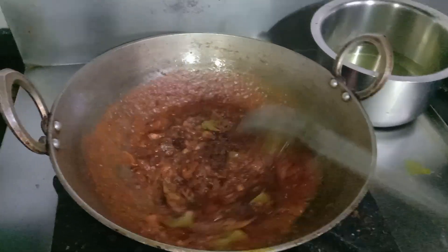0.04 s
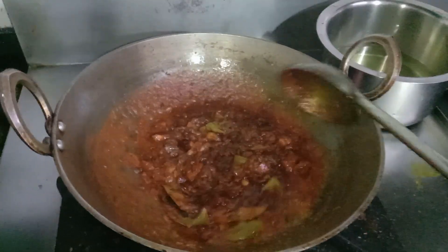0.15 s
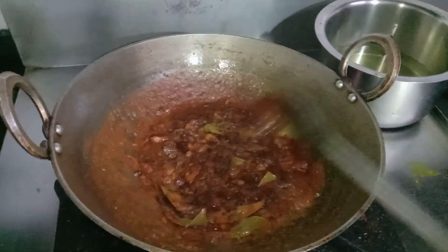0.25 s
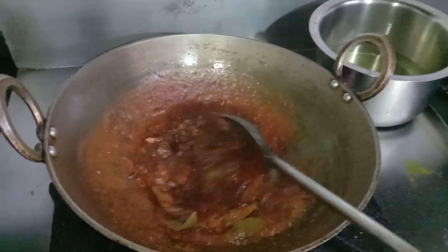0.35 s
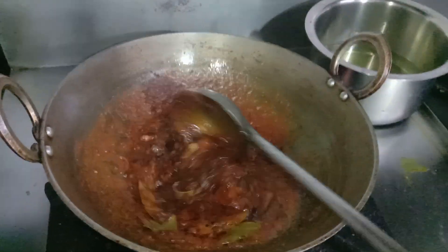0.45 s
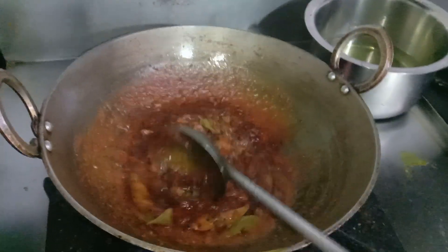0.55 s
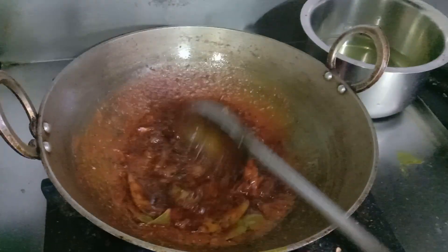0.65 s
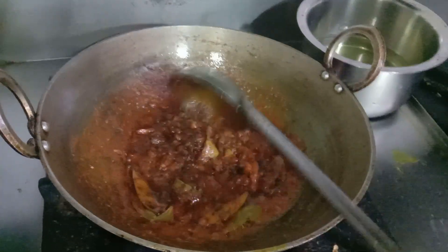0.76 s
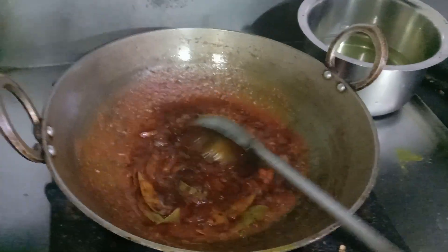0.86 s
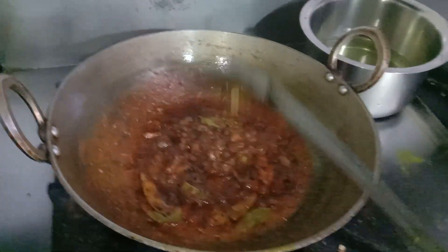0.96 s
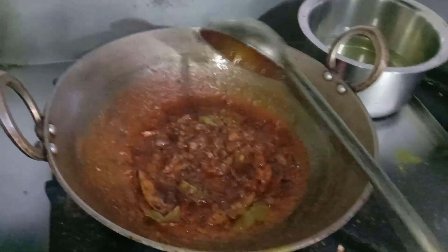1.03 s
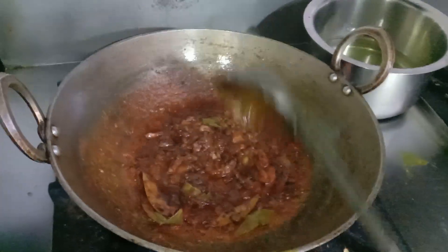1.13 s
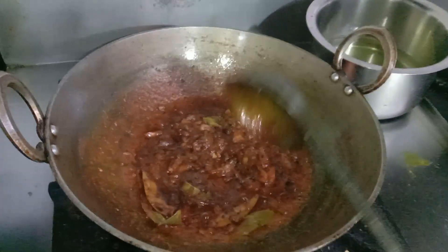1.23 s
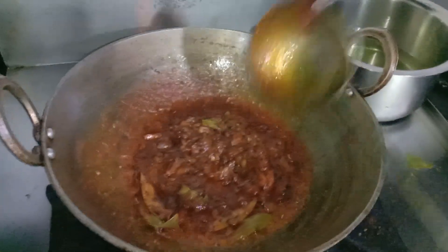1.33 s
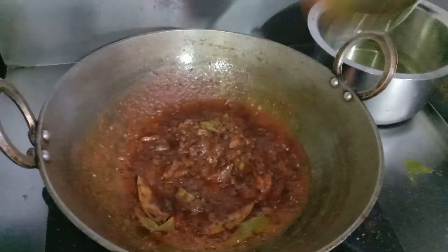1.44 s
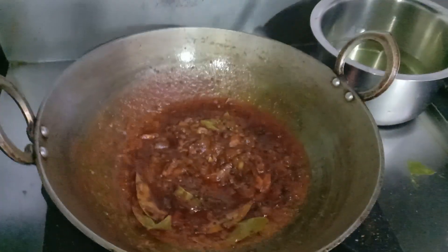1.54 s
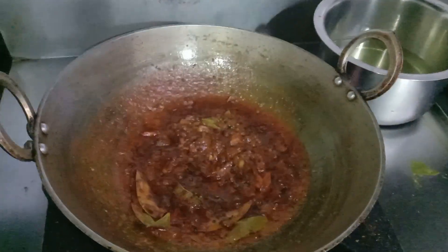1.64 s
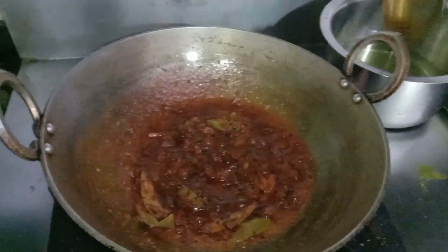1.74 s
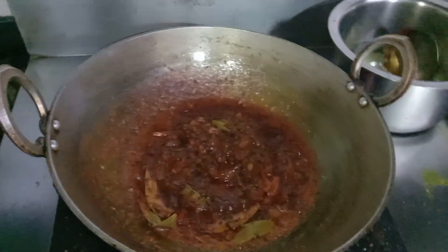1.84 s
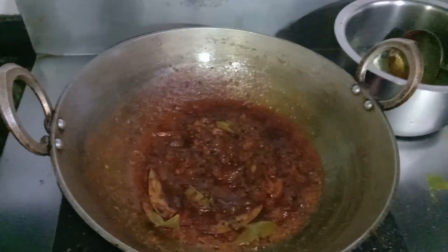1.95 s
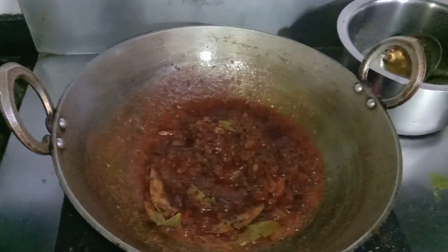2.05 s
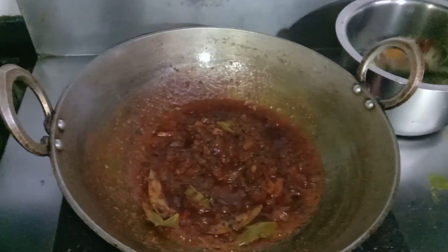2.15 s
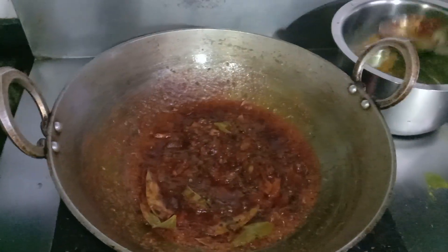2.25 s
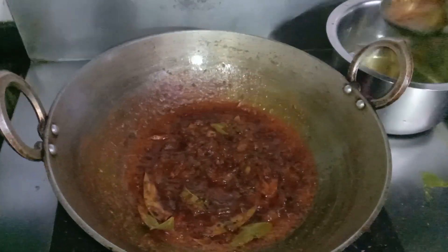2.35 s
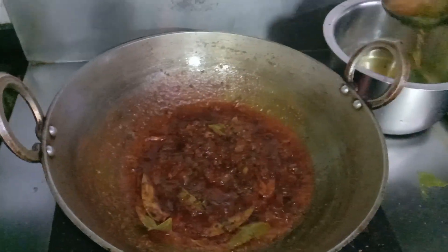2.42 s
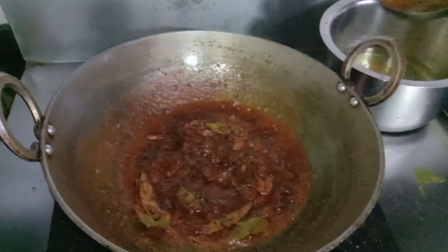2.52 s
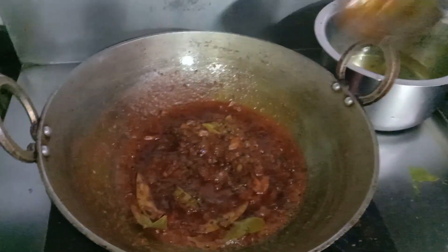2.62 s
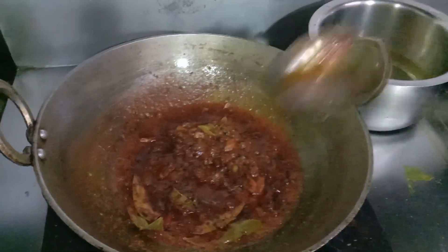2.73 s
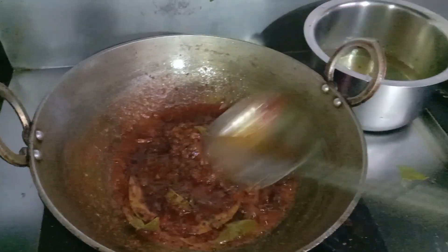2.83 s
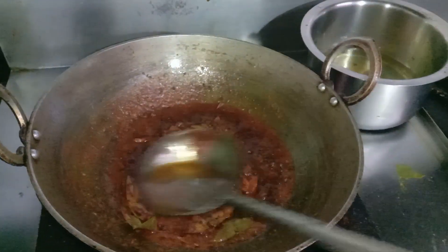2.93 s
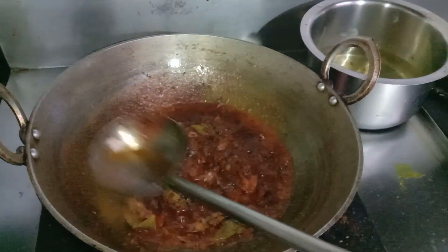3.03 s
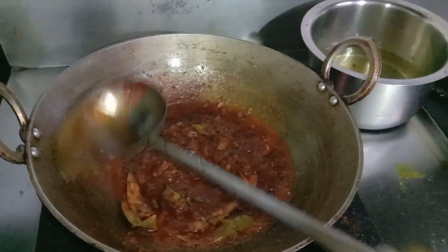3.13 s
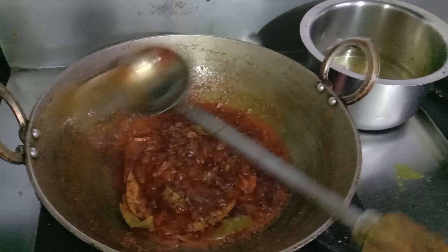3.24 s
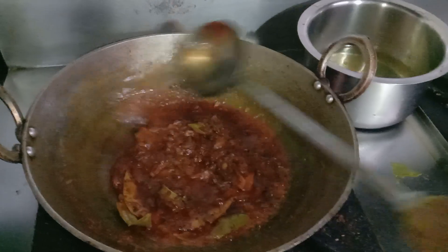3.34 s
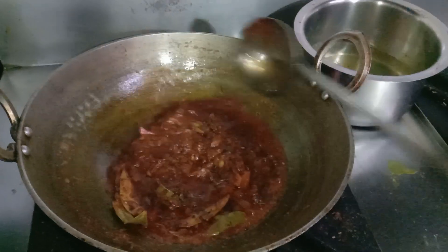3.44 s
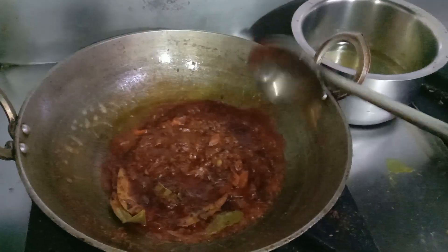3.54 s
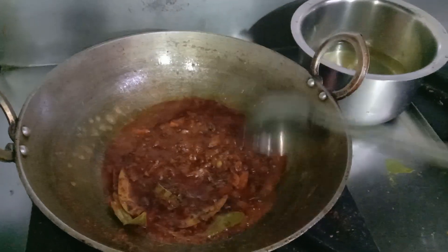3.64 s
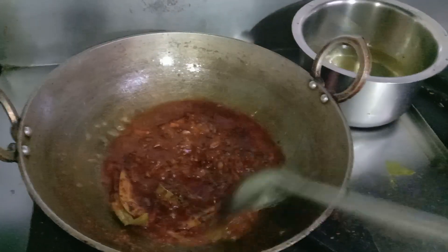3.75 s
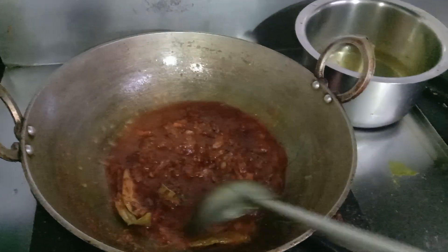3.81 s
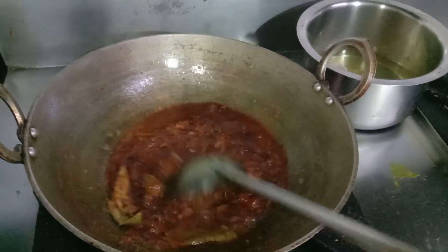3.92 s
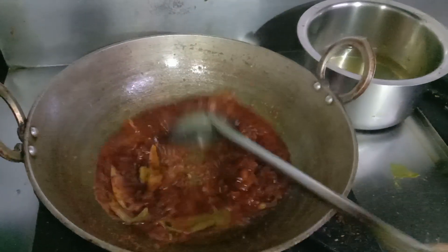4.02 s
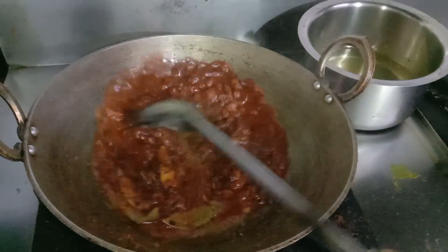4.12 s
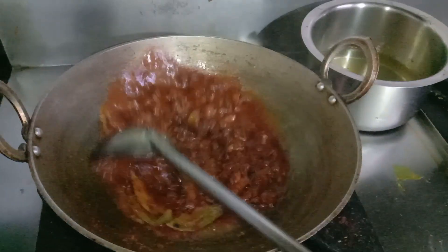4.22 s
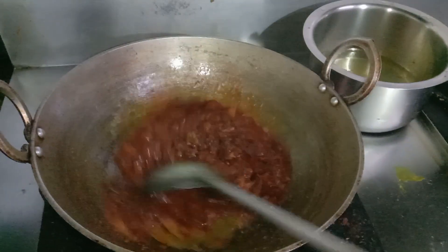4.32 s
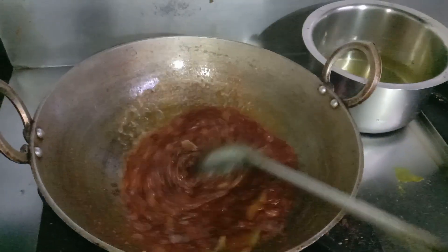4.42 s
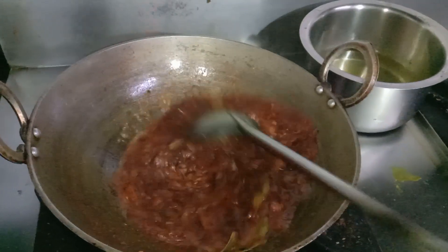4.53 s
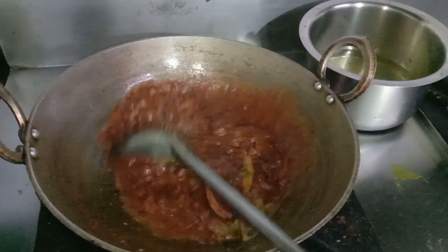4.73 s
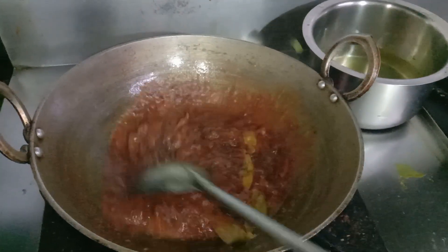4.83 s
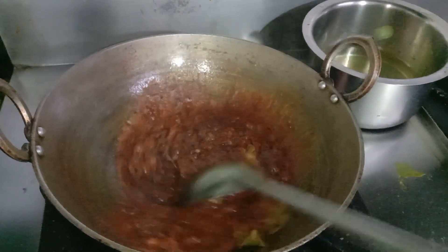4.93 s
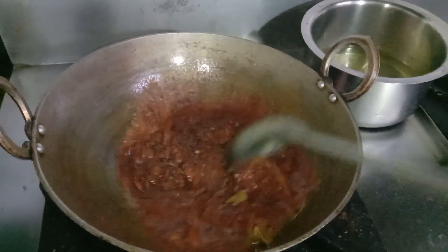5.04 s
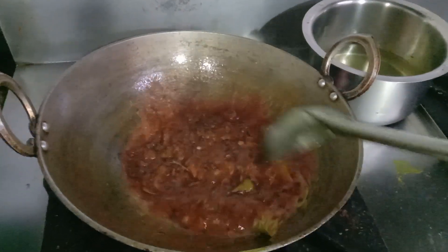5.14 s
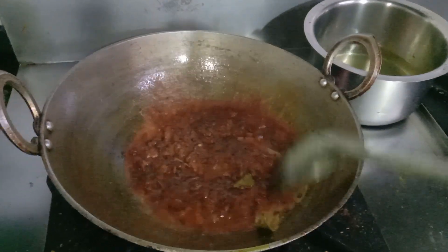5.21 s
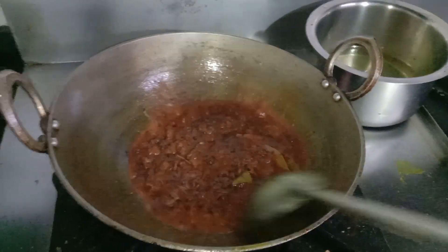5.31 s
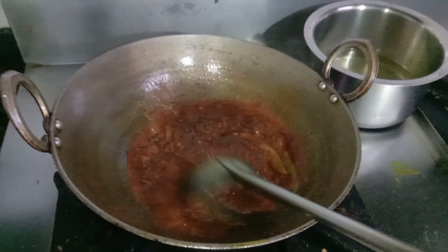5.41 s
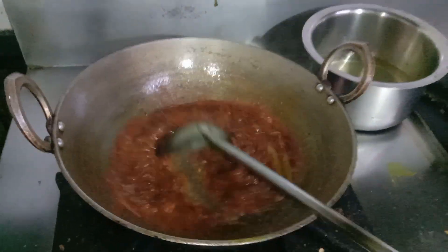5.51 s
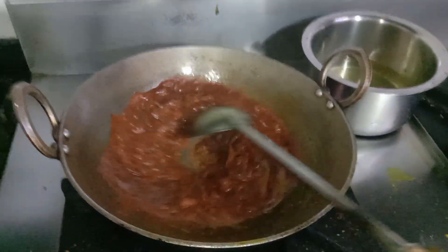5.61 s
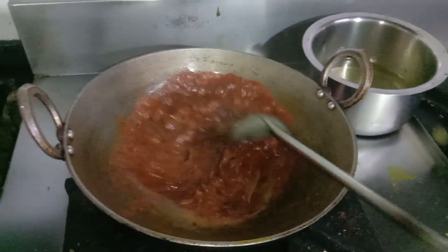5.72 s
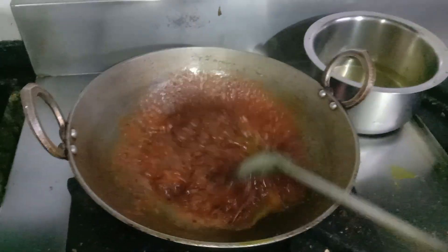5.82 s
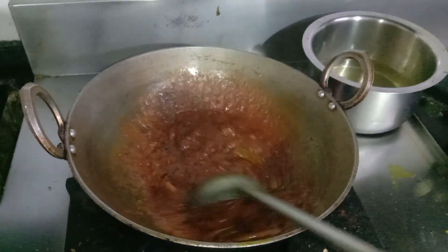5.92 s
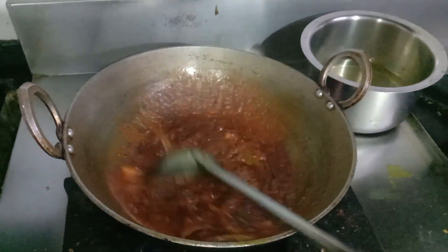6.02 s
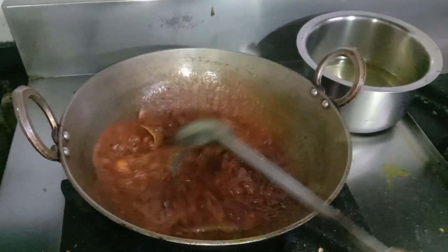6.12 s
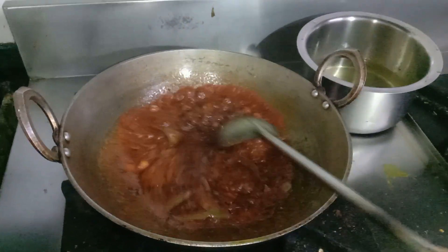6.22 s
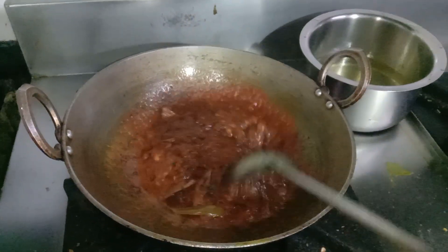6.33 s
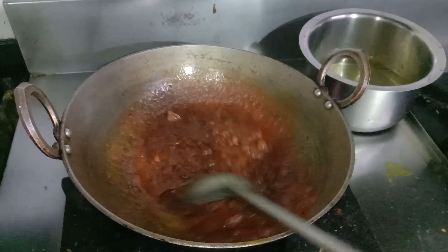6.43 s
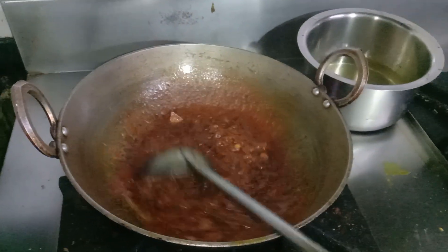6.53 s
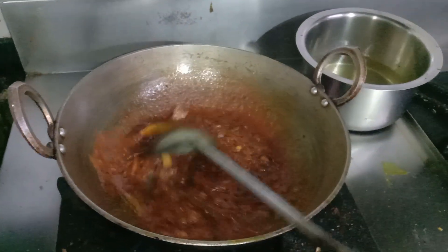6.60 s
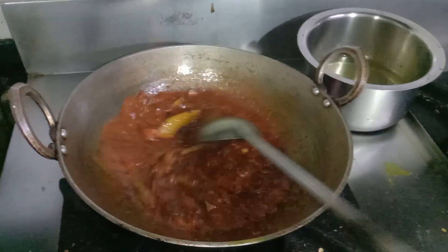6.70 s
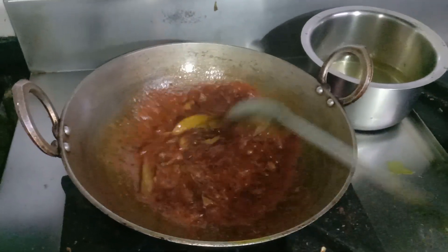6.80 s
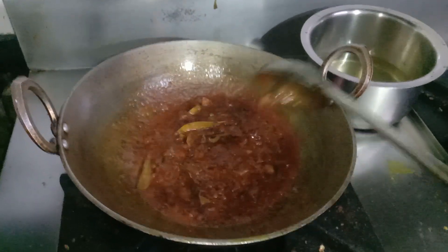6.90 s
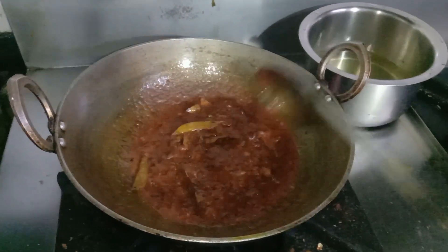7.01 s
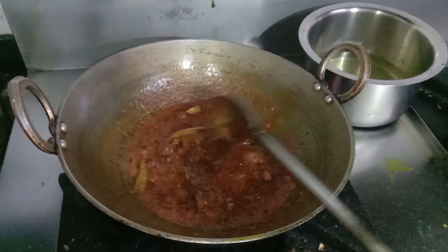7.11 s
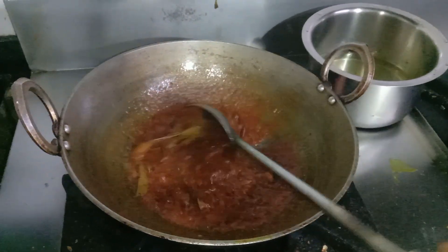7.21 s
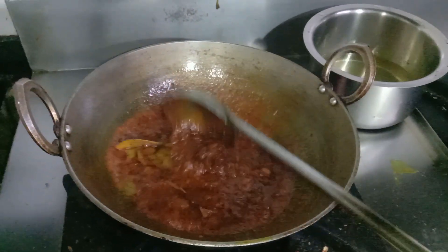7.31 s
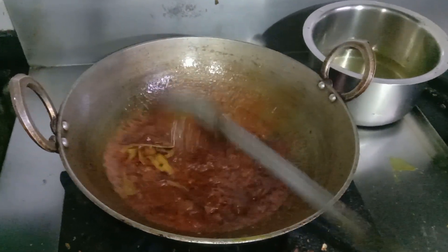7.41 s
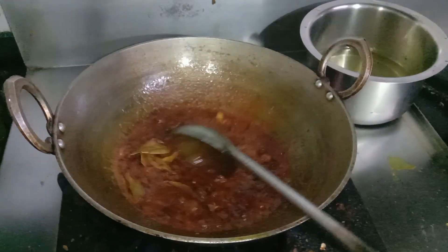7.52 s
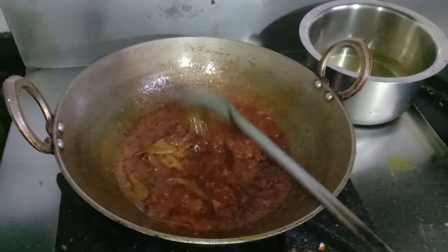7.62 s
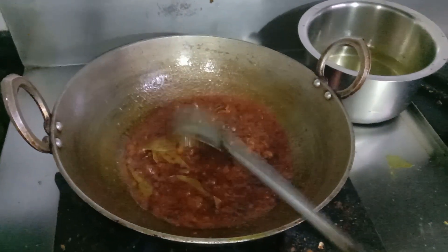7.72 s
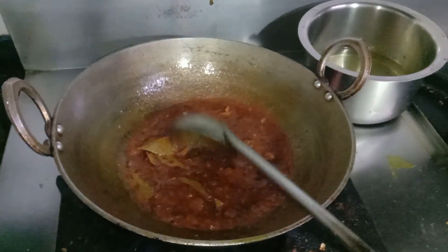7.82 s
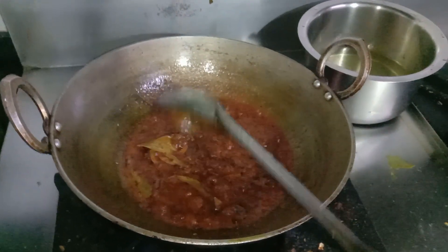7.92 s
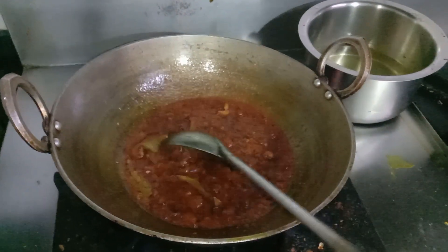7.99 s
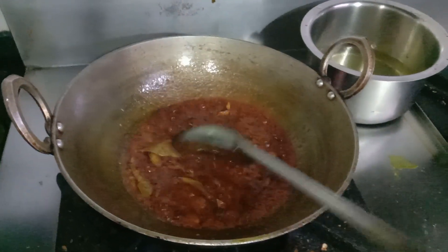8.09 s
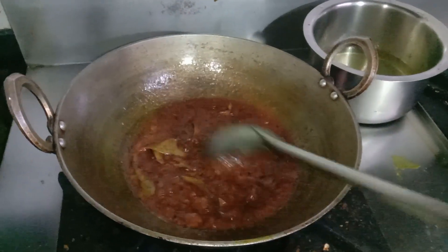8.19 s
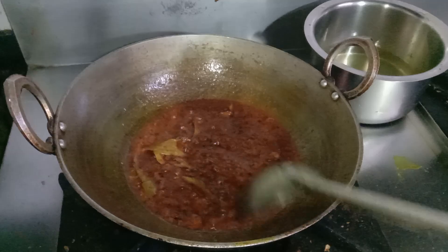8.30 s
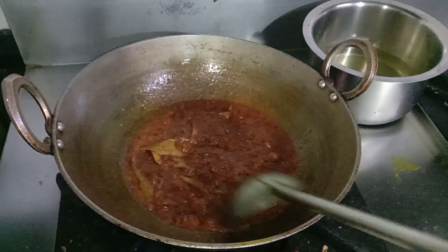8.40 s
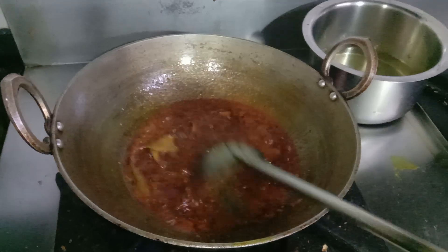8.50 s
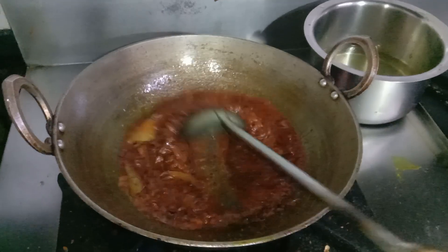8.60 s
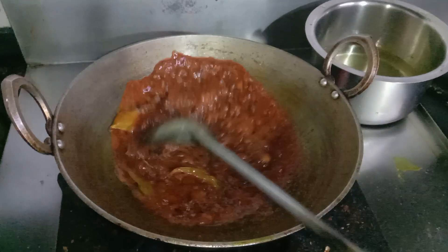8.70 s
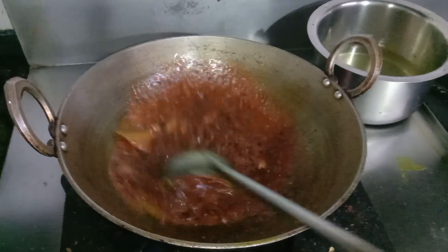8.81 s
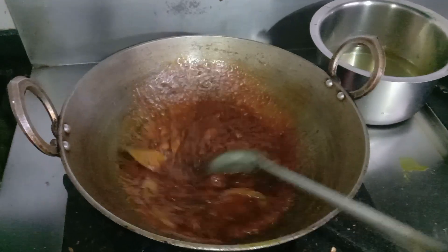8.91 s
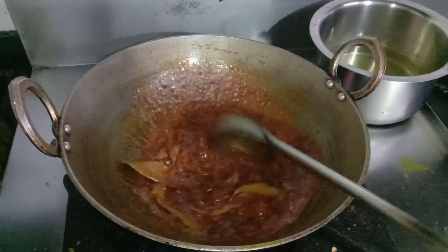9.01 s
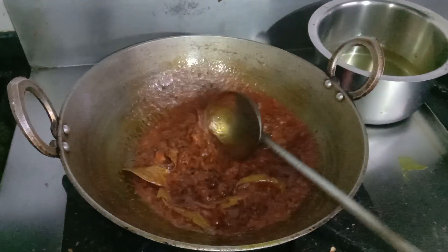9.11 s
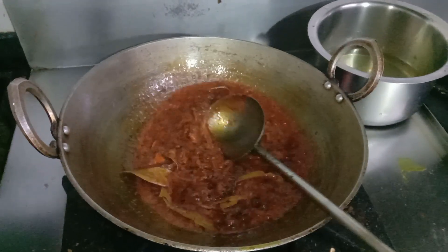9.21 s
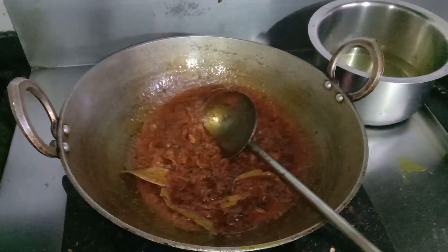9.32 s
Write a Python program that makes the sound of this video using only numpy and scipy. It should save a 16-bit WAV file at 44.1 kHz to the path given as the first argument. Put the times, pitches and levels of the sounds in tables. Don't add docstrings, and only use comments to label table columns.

```python
import sys
import numpy as np
from scipy import signal
from scipy.io import wavfile
from scipy.ndimage import uniform_filter1d

SR = 44100
rng = np.random.default_rng(int(sys.argv[2]) if len(sys.argv) > 2 else 0)


def amp(db):
    return 10 ** (np.asarray(db, float) / 20)


def write(x):
    x = np.atleast_2d(x).T
    wavfile.write(sys.argv[1], SR, np.round(np.clip(x, -1, 1) * 32767).astype(np.int16))


N = 412328

# hz, level_db, t60_s
PAN_MODES = [(296, 10, 0.11), (347.7, 15.5, 0.34), (438, -5, 0.21), (620, -40, 0.34), (620, 23, 0.35),
             (645, 19.5, .4), (779, 22, 0.26), (858, 5, 0.2), (932, 7, 0.33), (1028, 13, .3),
             (1250, -23, .3), (1620, -50, 0.34), (1690, -16, 0.22)]
# start_s, hold_s, level_db, release_db_per_s
SKID_STROKES = [(.1, .01, -45, 80), (.36, 0.018, -46, 1), (1.24, .1, -38.5, 80), (3.64, .04, -36.5, 150),
                (3.77, 0.032, -26.5, 33), (4.08, 0.072, -33, 45), (4.3, .1, -34.5, 68),
                (4.44, 0.065, -30.5, 38), (5.33, 0.039, -29, 39), (5.7, 0.59, -37.5, 30),
                (6.35, .01, -34.5, 44), (6.6, 0.069, -36.5, 46), (7.02, 0.26, -39.5, 48),
                (7.52, .01, -44, 174), (7.89, .01, -46, 198), (8.37, 0.15, -23.5, 57),
                (9.1, 0.15, -41.5, 75)]
SKID_RISE, SKID_REST_DB = 540, -50.5
CUP_HZ = 1260


def evened(x):
    return x / np.sqrt(np.mean(x ** 2) + 1e-20)


def read(points, hz):
    f, value = np.transpose(points)
    return np.interp(np.log(hz + 1), np.log(f + 1), value)


def add(mix, s, sound):
    part = mix[max(round(s * SR), 0):][:len(sound)]
    part += sound[:len(part)]


def coloured(x, spectrum):
    size = 8192
    gain_db = read(spectrum, abs(np.fft.fftfreq(size, 1 / SR)))
    log_gain = np.log(amp(np.maximum(gain_db, -100)))
    taps = np.fft.ifft(np.exp(np.conj(signal.hilbert(log_gain)))).real[:size // 2]
    return signal.oaconvolve(x, taps)[:N]


def resonate(x, hz, width):
    return signal.lfilter(*signal.iirpeak(hz, hz / width, SR), x)


def bursts(per_s, spread_db, hiss):
    sizes = amp(spread_db * np.minimum(rng.exponential(1, N), 3)) * rng.choice([-1., 1.], N)
    clicks = sizes * (rng.random(N) < per_s / SR)
    return evened(clicks) + hiss * rng.standard_normal(N)


def flutter(db, seconds):
    return amp(db * evened(uniform_filter1d(rng.standard_normal(N), int(seconds * SR))))


def patchy(x, db):
    z = signal.stft(x, nperseg=512)[2]
    spots = uniform_filter1d(rng.standard_normal(z.shape), size=6, axis=0)
    spots = uniform_filter1d(spots, size=10, axis=1)
    return signal.istft(z * amp(db * evened(spots)), nperseg=512)[1][:N]


def strokes(rows, rise, rest_db):
    t = np.linspace(0, N / SR, num=3000)
    s, hold, db, release = np.transpose(rows)[:, :, None]
    level_db = db - rise * np.maximum(s - t, 0) - release * np.maximum(t - s - hold, 0)
    return np.interp(np.arange(N) / SR, t, amp(np.maximum(level_db.max(0), rest_db)))


def kitchen(x):
    # hz, t60_s
    room_decay = [(100, 0.26), (1000, 0.8), (2500, .55), (5000, 0.45), (12000, 0.35)]
    taps = np.zeros(SR)
    at = np.arange(300, SR - 20, 20)
    taps[at + rng.integers(0, 20, len(at))] = rng.choice([-1., 1.], len(at))
    hz, t, z = signal.stft(taps, SR, nperseg=256)
    decay = amp(-60 * t / read(room_decay, hz)[:, None])
    tail = signal.istft(z * decay, SR, nperseg=256)[1]
    return signal.fftconvolve(x, tail / np.linalg.norm(tail))[:N]


def burner():
    # hz, density_db_per_hz
    flame_spectrum = [(15, -80), (25, -38), (60, -7), (147, 3.5), (220, -10.5), (237, -6.5), (438, -15.5),
                      (487, -14.5), (647, -6.5), (687, -37), (900, -56), (1170, -47), (1980, -120)]
    # time_s, level_db
    guttering = [(1.45, -55), (1.82, -55), (1.84, -49), (2.36, -57), (2.49, -50), (2.83, -58.5),
                 (2.96, -49.5), (3.05, -60), (3.45, -57)]
    usual_db = -53.5
    level_db = np.interp(np.arange(N) / SR, *np.transpose(guttering), left=usual_db, right=usual_db)
    return amp(level_db) * evened(coloured(rng.standard_normal(N), flame_spectrum)) * flutter(1.5, 0.07)


def boiling():
    # time_s, level_db
    heat = [(0.0, -42.5), (0.18, -43), (0.86, -49), (2.71, -54.5), (2.91, -57), (3.19, -56.5), (3.38, -45),
            (3.54, -42), (4.53, -40), (5.31, -45), (5.94, -43.5), (6.55, -49), (6.78, -53.5), (7.0, -48),
            (8.1, -60.5), (8.38, -61), (8.52, -48.5), (8.98, -52.5), (9.35, -54)]
    fizz_db, dry_roar_db, wet_roar_db, simmer_db = 4.5, 2.5, 7.5, -52.5
    pour_s, soak_s = 3.37, 0.13
    t = np.arange(N) / SR
    heat_db = np.interp(t, *np.transpose(heat))
    wet_db = np.interp(t, [pour_s, pour_s + soak_s], [dry_roar_db, wet_roar_db])
    smear = amp(-31) * strokes(SKID_STROKES, SKID_RISE, SKID_REST_DB)
    roar_gain = np.sqrt(amp(heat_db + wet_db) ** 2 + amp(simmer_db) ** 2 + smear ** 2)
    return amp(heat_db + fizz_db), roar_gain


def sizzle():
    # hz, density_db_per_hz
    fizz_spectrum = [(2060, -12), (3500, -8), (4080, -16), (5190, 4.5), (5820, -14), (6320, -10.5),
                     (7460, -5.5), (8050, -12), (9810, 4), (10800, 4), (13600, -7), (15000, -1), (16000, 2)]
    # hz, density_db_per_hz
    roar_spectrum = [(290, -32), (500, -29), (610, -10.5), (674, -15.5), (831, -16.5), (1060, -13),
                     (1260, -4), (1540, -8), (2240, -3), (2930, -8), (3490, -8.5), (4400, -19),
                     (5800, -11.5), (6340, -27), (7000, -22.5), (9100, -68), (15400, -120)]
    # time_s, top_fizz_db
    fineness_of_bubbles = [(0, 0), (1.5, 1), (2.6, -1), (3.4, -0.5), (4.3, -1.5), (5.2, -1.5), (6.2, 1),
                           (6.6, 4.5), (6.95, 2), (7.6, 1.5), (8.3, 3), (9.35, 4.5)]
    # hz, width_hz, level_db (all sound at one level here)
    glints = [(2340, 250, 0), (5380, 43, -8), (5900, 37, -8), (6570, 230, -16), (11440, 2000, -11)]
    fizz = evened(coloured(bursts(per_s=2100, spread_db=-5.0, hiss=1.9), fizz_spectrum)) * flutter(1.0, 0.038)
    roar = evened(coloured(bursts(per_s=1500, spread_db=0.5, hiss=1.7), roar_spectrum)) * flutter(0.12, 0.0097)
    top_db = np.interp(np.arange(N) / SR, *np.transpose(fineness_of_bubbles))
    fizz = fizz + (amp(top_db) - 1) * resonate(fizz, 12500, 5000)
    fizz_gain, roar_gain = boiling()
    both = patchy(fizz_gain * fizz + roar_gain * roar, db=1.6)
    return both + 0.35 * sum(resonate(both, hz, width) for hz, width, db in glints)


def scrape():
    # hz, density_db_per_hz
    wet_spectrum = [(47, -41), (80, -17), (102, 10), (269, -6), (376, -3), (509, 8.5), (629, -6.5),
                    (689, -6), (1260, 5), (1540, -14.5), (3000, -17), (3900, -79), (6600, -120)]
    # hz, density_db_per_hz
    bare_spectrum = [(410, -70.5), (700, -15.5), (1050, 3), (1180, -2.5), (1270, 6), (1650, -49),
                     (1930, -7.5), (2100, -44), (3160, -49), (4310, -51), (9000, -42), (11700, -67),
                     (19800, -120)]
    # start_s, hold_s, level_db, release_db_per_s
    sweep_strokes = [(0, 0.0049, -19, 142), (.12, 0.11, -32.5, 206), (1.37, 0.02, -32.5, 141),
                     (3.62, 0.064, -34.5, 280), (4.0, 0.25, -35, 62), (4.63, 0.38, -32.5, 30),
                     (4.98, .04, -30.5, 36), (5.5, 0.21, -32, 54), (6.03, .02, -33, 40),
                     (6.35, 0.11, -34.5, 27), (7.11, .01, -39.5, 43), (7.65, 0.013, -30, 197),
                     (7.89, 0.026, -23.5, 257), (8.14, 0.0089, -26.5, 83), (8.49, 0.049, -30.5, 70),
                     (8.66, 0.19, -34.5, 72), (9.17, 0.14, -33.5, 52)]
    slips = bursts(per_s=900, spread_db=3.5, hiss=1.1)
    bowl = sum(amp(db / 2) * resonate(slips, hz, 32) for hz, db, t60 in PAN_MODES)
    wet = evened(coloured(0.9 * slips + 2.05 * bowl, wet_spectrum)) * flutter(1.2, .015)
    chatter = bursts(per_s=880, spread_db=4.0, hiss=0.78)
    cup = resonate(chatter, CUP_HZ, 95)
    bare = evened(coloured(chatter + 1.9 * cup, bare_spectrum)) * flutter(1.6, .008)
    wet_gain = amp(-4.0) * strokes(sweep_strokes, rise=78, rest_db=-49.5)
    bare_gain = amp(-1.0) * strokes(SKID_STROKES, SKID_RISE, SKID_REST_DB)
    return wet_gain * wet + bare_gain * bare


def ticks():
    # start_s, level_db
    catches = [(0.0358, -32), (0.098, -23), (0.1575, -23), (1.3733, -26), (3.5339, -21), (3.579, -20),
               (3.659, -19), (3.8126, -14), (3.8327, -27), (4.0422, -24), (4.1465, -13), (4.2117, -30),
               (4.383, -24), (4.434, -15), (4.4705, -14), (5.021, -17), (5.1343, -17.5), (5.3187, -7),
               (5.3317, -12), (5.3388, -14), (5.3594, -13), (5.368, -14), (5.4922, -28), (5.7678, -27),
               (5.8114, -20), (5.954, -30), (6.0485, -26), (6.157, -13), (6.323, -25), (7.486, -23),
               (7.939, -17), (8.06, -22), (8.252, -20), (8.3712, -17), (8.4408, -7), (8.4549, -9),
               (8.4838, -14), (8.5038, -9), (8.542, -14), (8.653, -12), (8.6905, -15), (8.71, -27),
               (8.764, -30), (9.0945, -21), (9.117, -20), (6.913, -21), (8.826, -18.5), (8.865, -13),
               (1.227, -24), (7.196, -27), (7.22, -29), (7.25, -26)]
    t, out = np.arange(SR // 30) / SR, np.zeros(N)
    rise_s, fall_s = 0.0021, 0.0034
    envelope = (1 - np.exp(-t / rise_s)) * np.exp(-t / fall_s)
    for (s, db), off in zip(catches, rng.uniform(-0.057, 0.032, len(catches))):
        add(out, s, amp(db + 3) * np.sin(2 * np.pi * CUP_HZ * (1 + off) * t) * envelope)
    return out


def thumps():
    # start_s, level_db, pitch_hz, t60_s
    rocks = [(0.09, -21, 131, 0.12), (0.566, -26, 139, 0.26), (0.84, -29, 104, 0.43), (1.2, -22, 300, .3),
             (1.2015, -4, 950, .025), (1.893, -30, 1000, .1), (1.917, -32, 900, .1), (1.942, -33, 1280, .1),
             (2.075, -31, 2040, .06), (1.21, -15, 760, .2), (2.074, -30, 732, .3), (2.835, -42, 640, .3),
             (3.02, -40, 1080, .6), (3.03, -40, 2500, .08), (3.585, -23, 640, .15), (4.075, -25, 430, .15),
             (4.464, -17, 629, .15), (4.472, -19, 650, .15), (4.478, -27, 96, 0.17), (4.709, -30, 115, 0.3),
             (4.988, -17, 637, 0.3), (5.303, -15, 1040, .1), (5.336, -19, 230, .06),
             (5.342, -13, 120, 0.08), (5.868, -30, 105, 0.2), (6.343, -24, 145, 0.18),
             (6.48, -28, 140, .15), (6.95, -24, 330, .5), (6.956, -21, 97, 0.15), (7.467, -24, 141, 0.3),
             (7.482, -17, 345, .24), (7.747, -26, 100, 0.37), (7.979, -28, 105, 0.3), (8.375, -31, 130, .1),
             (8.984, -17, 290, .07), (8.978, -30, 105, 0.2), (8.984, -19, 345, .2)]
    t, out = np.arange(SR // 2) / SR, np.zeros(N)
    for s, db, hz, t60 in rocks:
        decay = amp(db - 3.5 - 60 * t / t60)
        add(out, s, decay * np.sin(2 * np.pi * hz * t) * (1 - np.exp(-t / 0.00024)))
    return out


def ring(modes, hits, db, smear, contact, count, waver_db=5):
    t, out = np.float32(np.arange(SR // 2) / SR), np.zeros(N)
    hz, mode_db, t60 = np.float32(np.transpose(modes)[:, :, None])
    longest_s, stray_damp = 1.2, 1.5
    for s, hit_db, share in hits:
        split, lag = np.float32(rng.uniform(-1.016, 1, (2, count, len(modes), 1)))
        split = split * abs(split) * (np.arange(count) > 0)[:, None, None]
        decay_rate = np.float32(np.log(1000) / share) * (1 + stray_damp * abs(split)) / np.minimum(t60, longest_s)
        phase = np.float32(2 * np.pi) * (hz * (1 + smear * split) * t + 0.27 * lag)
        cluster = (np.exp(-decay_rate * t) * np.sin(phase)).sum(0) / np.sqrt(count)
        waver = uniform_filter1d(rng.standard_normal(cluster.shape), 400)
        waver = evened(uniform_filter1d(waver, 400))
        gain = amp(mode_db + waver_db * waver * np.minimum(t / 0.011, 1))
        sound = (gain * cluster).sum(0) * (1 - np.exp(-t / 0.00035))
        add(out, s, amp(hit_db + db) * sound * (1 + contact * np.exp(-t / 0.0055)))
    return out


def haze():
    # hz, level_db, t60_s
    haze_modes = [(2610, -4, 0.24), (3530, -9, 0.67), (4120, 0, 0.92), (4830, -5, 0.83),
                  (5820, -11.5, 0.96), (6820, -5.5, 0.63)]
    # start_s, level_db, decay_share
    haze_hits = [(1.181, -23.5, 0.66), (7.741, -27.5, 1), (7.985, -33, 0.75), (8.334, -24, 1),
                 (8.441, -29, 1), (5.27, -27, 0.64), (6.949, -26, 0.87)]
    return ring(haze_modes, haze_hits, -11.5, smear=.14, contact=0.11, count=14)


def graze():
    # hz, level_db, t60_s
    graze_modes = [(2365, 1.5, 0.14), (2780, -1, 0.11), (4000, -3, 0.14), (4750, -2, 0.43),
                   (5200, -9, 0.22), (6100, -14, .15)]
    # start_s, level_db, decay_share
    graze_hits = [(.172, -34.5, 0.39), (9.207, -37, 0.54), (12, -42.5, 1), (8.795, -46, 1)]
    return ring(graze_modes, graze_hits, -2.5, smear=.028, contact=1.4, count=5)


def pot_taps():
    # hz, level_db, t60_s
    side_modes = [(350, -9, .5), (732, -5, .42), (1260, -2, .12), (1520, -1, .1), (1750, -10, .25),
                  (1930, -1, .5)]
    # start_s, level_db, decay_share
    side_hits = [(1.879, -25, 1)]
    # hz, level_db, t60_s
    lip_modes = [(1130, -5, .1), (1700, -13, .12), (1930, 0, .36), (2050, -8, .07), (2270, -16, .5)]
    # start_s, level_db, decay_share
    lip_hits = [(2.048, -22, 1)]
    side = ring(side_modes, side_hits, -9.0, smear=.004, contact=0.091, count=1, waver_db=3.5)
    lip = ring(lip_modes, lip_hits, -9.0, smear=.004, contact=0.091, count=1, waver_db=3.5)
    return side + lip


def rim_ring():
    # hz, level_db, t60_s
    rim_modes = [(1640, 0, 0.12), (2430, -10, 0.3), (3170, -7, 0.5), (3440, -12, .4), (4500, -14, .3),
                 (5114, -5, 0.3), (5400, -13, 0.6), (5900, -14, .4), (6810, -10, .15), (10250, -3, 0.12),
                 (11830, 3, 0.086), (3080, 4, .06)]
    # start_s, level_db, decay_share
    rim_hits = [(1.181, -18, 0.61)]
    clip_modes = [(12500, 0, .04), (14800, 7, .05)]
    # start_s, level_db, decay_share
    clip_hits = [(6.941, -12, 1)]
    rim = ring(rim_modes, rim_hits, -6.0, smear=.04, contact=2.7, count=7)
    return rim + ring(clip_modes, clip_hits, -6, smear=.14, contact=1.1, count=8)


def wall_ring():
    # hz, level_db, t60_s
    wall_modes = [(1923, 6, 0.23), (2390, 5, 0.085), (2760, -6, 0.85), (3120, -21, 0.35), (3800, -23, 0.98),
                  (4230, -15, 1), (4750, -17, 1), (4990, -3, 0.67), (5100, -11, 0.66), (6000, -7, 1),
                  (5760, -38, 0.7), (6560, -12, 0.16), (7300, -20, .3), (2430, 3, .1)]
    # start_s, level_db, decay_share
    wall_hits = [(3.501, -12, 0.4), (5.2703, -16.5, 1)]
    # hz, level_db, t60_s
    rebound_modes = [(1810, -5, 0.18), (2213, -2.5, 0.13), (3065, 1, .3), (3607, -4, .3), (4820, 0, 0.56),
                     (4300, -17, .5), (5430, -9, 0.49), (5840, -16, 0.37), (7000, -2, 0.24)]
    # start_s, level_db, decay_share
    rebound_hits = [
        (6.9404, -19, .6),
        (6.959, -24, 0.92),
    ]
    # hz, level_db, t60_s
    clang_modes = [(1960, -1, .6), (2492, -7, .6), (2692, -8, .5), (3429, -9, .8), (3924, -6, .9),
                   (4177, -2, 1.2), (4823, -4, .9), (5120, -7, 1), (5620, -7, 1), (5809, -7, .7),
                   (6150, -6, .8), (6729, -7, .8), (7321, -10, .7), (4250, -7, 1.1)]
    # start_s, level_db, decay_share
    clang_hits = [(8.3334, -16.5, 0.85), (8.35, -29, 0.65), (8.404, -23, 1), (8.44, -26, 0.95)]
    wall = ring(wall_modes, wall_hits, -19.5, smear=.06, contact=0.76, count=8)
    wall += ring(rebound_modes, rebound_hits, -12.5, smear=.06, contact=1.7, count=6)
    return wall + ring(clang_modes, clang_hits, -18.0, smear=.028, contact=2.4, count=7)


def ladle_ring():
    # hz, level_db, t60_s
    flat_modes = [(2869, -9, 0.4), (3031, 5, 1.0), (3070, 2, .9), (3451, -8, 0.6), (3784, -6, .9),
                  (4161, -6, 0.7), (4450, -7, .7), (4640, -1, .9), (5093, -9, .7), (5400, -12, .6),
                  (5792, -2, 0.8), (5900, -7, .6), (6605, -9, 0.4), (6831, -10, 0.5)]
    # start_s, level_db, decay_share
    flat_hits = [(7.7394, -20.5, 1)]
    # hz, level_db, t60_s
    ladle_modes = [(2003, -12, .25), (3031, -2, 0.65), (3055, -4, 0.65), (3456, -13, 0.6), (3601, -18, 0.6),
                   (3784, -11, 1.1), (3989, -12, .8), (4172, -11, .75), (4640, -10, .75), (5800, -22, 0.25),
                   (7251, -24, 0.2)]
    # start_s, level_db, decay_share
    ladle_hits = [(7.9861, -19, 1)]
    flat = ring(flat_modes, flat_hits, -19.5, smear=.014, contact=2.0, count=6)
    return flat + ring(ladle_modes, ladle_hits, -13.5, smear=.014, contact=3.9, count=4)


def blows():
    # start_s, crack_db, boom_db, brightness_db
    landings = [(0.172, -4.5, -18.5, -5.5), (0.566, -14, -28.5, -16), (0.837, -6.5, -23.5, -24),
                (3.499, 4.5, -12, -11.5), (3.736, 9.5, -11, -14.5), (4.075, 0, -25.5, -21),
                (4.101, -26, -22, -7), (4.684, -18, -25, -24), (5.27, 1, -14, -0.5), (5.328, 2, -32, -30),
                (5.564, 3.5, -21.5, -34), (6.135, -0.5, -19, -28), (6.647, 0, -23, -22),
                (6.941, 0.5, -16.5, -4), (7.472, 10.5, -12.5, -33), (7.74, 12.5, -10.5, -24),
                (7.985, 14.5, -13.5, -29.5), (8.635, 3, -22.5, -29), (8.984, 3.5, -13, -27.5)]
    # start_s, crack_db, boom_db, brightness_db, boom_centre_hz
    deep = [(0.002, -31, -20.5, -52, 740), (0.086, -29, -31, -5, 616), (0.914, -26, -46, -23, 622),
            (1.18, 6, -10, -13, 854), (1.211, -11, -22, -30, 557), (4.462, -5, -15.5, -19, 710),
            (4.509, -19, -26, -3, 650), (4.709, -8, -27, -22, 630), (4.986, -7, -17.5, -41, 895),
            (5.857, -13, -14, -43, 855), (6.339, -4, -18.5, -36, 684), (6.959, -12, -23, -18, 805),
            (7.02, -29, -27, -39, 645), (7.663, -26, -31, -40, 635), (8.975, -29, -16, -56, 620)]
    # start_s, crack_db, boom_db, brightness_db
    glances = [(0.813, -38, -32, -20), (1.202, 2.5, -14, -42), (1.226, -11, -33, -26),
               (1.883, -14, -29, -29), (2.049, -18, -35, -19), (2.429, -23, -53, -9), (3.753, 6, -51, -36),
               (3.809, -15, -28, -1), (5.288, 10, -11.5, -44), (5.305, -1, -17.5, -34),
               (5.348, 0, -36, -28), (8.334, 13.5, -11.5, -15), (8.405, 6.5, -15, -24),
               (8.827, -16, -33, -30), (8.864, -12, -37.5, -34), (9.209, -10, -24, -17)]
    shaking = [(*row, 1240) for row in landings] + deep
    sparing = [(*row, 1340) for row in glances]
    hits = []
    for stove_db, rows in [(-40.5, shaking), (-77, sparing)]:
        for s, crack_db, boom_db, bright_db, centre_hz in rows:
            thud_db = min(stove_db - boom_db, 6)
            hits.append((s, crack_db, boom_db, thud_db, bright_db, centre_hz))
    return sorted(hits)


def boom_spectrum(thud_db, bright_db, centre_hz):
    return sorted([
        (80, thud_db - 0.5), (220, thud_db + 9), (0.75 * centre_hz + 50, -6), (centre_hz, 0),
        (1400, -5.5 * np.log2(1500 / centre_hz)), (1650, -1.5 + .5 * bright_db),
        (2300, 0.5 + 0.36 * bright_db), (3200, bright_db + 5.5),
        (6500, bright_db - 4.5), (11000, bright_db - 32)])


def knocks():
    # hz, t60_s
    crowd_decay = [(100, 0.67), (600, 0.59), (1300, 0.037), (3000, 0.044), (8000, 0.2)]
    t = (np.arange(SR // 2) / SR).astype(np.float32)
    crowd_hz = 90 + 13000 * rng.random(700) ** 2.2
    hz = np.concatenate([[m[0] for m in PAN_MODES], crowd_hz]).astype(np.float32)
    own_db = np.concatenate([[0.64 + 0.4 * m[1] for m in PAN_MODES], 0 * crowd_hz])
    fade = np.exp(np.outer(np.float32(-np.log(1000) / read(crowd_decay, hz)), t))
    turn = np.outer(np.float32(2 * np.pi) * hz, t)
    hits, out = blows(), np.zeros(N)
    luck = rng.standard_normal((len(hits), 2, len(hz)))
    grit = rng.standard_normal((len(hits), len(t) // 16))
    gains = [amp(own_db + read(boom_spectrum(*hit[3:]), hz)) for hit in hits]
    gains = gains / np.linalg.norm(gains, axis=1, keepdims=True)
    booms = np.float32(gains * luck[:, 0]) @ (fade * np.cos(turn))
    booms -= np.float32(gains * luck[:, 1]) @ (fade * np.sin(turn))
    booms *= 1 - np.exp(-t / 0.0029)
    rattle = uniform_filter1d(rng.standard_normal(booms.shape), 400, axis=1)
    booms *= amp(3.6 * evened(rattle)) * (0.55 + 0.92 * np.exp(-t / 0.037))
    u = t[:grit.shape[1]]
    cup = np.sin(2 * np.pi * CUP_HZ * u) * (1 - np.exp(-u / 0.00052)) * np.exp(-u / 0.0024)
    for (s, crack_db, boom_db, thud_db, bright_db, centre_hz), boom, g in zip(hits, booms, grit):
        tick = amp(bright_db - 3.5) * g * np.exp(-u / 0.0087)
        add(out, s + 0.00037, amp(boom_db - 3.0) * boom)
        add(out, s + .0004, amp(crack_db - 9.0) * (0.94 * cup + tick))
    return out


def scene():
    # hz, level_db
    mic_response = [(30, -55), (70, -1.5), (110, -3.5), (1330, -1), (1620, 0.5), (2100, 2), (3400, -3),
                    (4400, -3.5), (5500, 1.5), (8200, -10), (10500, -2), (13500, -18.5), (15500, -12),
                    (16500, -23)]
    steady = burner() + sizzle() + scrape()
    pan = thumps() + knocks()
    steel = haze() + graze() + pot_taps() + rim_ring() + wall_ring() + ladle_ring()
    metal = coloured(pan + steel + ticks(), mic_response)
    return (metal + amp(-8.0) * kitchen(metal) + steady)[None]


def low_pass(x):
    return signal.sosfilt(signal.butter(12, 16800, fs=SR, output="sos"), x)


def lowpass(x, hz):
    taps = signal.firwin(1023, hz, window=("kaiser", 9), fs=SR)
    return signal.oaconvolve(x, taps[None], "same")


def record(dry):
    limited = dry / (1 + (abs(dry) / .9) ** 6) ** (1 / 6)
    low = lowpass(limited, 15650)
    top = lowpass(limited, 16700) - low
    quick = uniform_filter1d(top ** 2, 300)
    slow = uniform_filter1d(top ** 2, 4000, origin=1999)
    gate = uniform_filter1d(1. * (quick > 7 * slow), 300)
    return low_pass(low + top * gate)


dry = scene()
out = record(dry)
write(out)
```